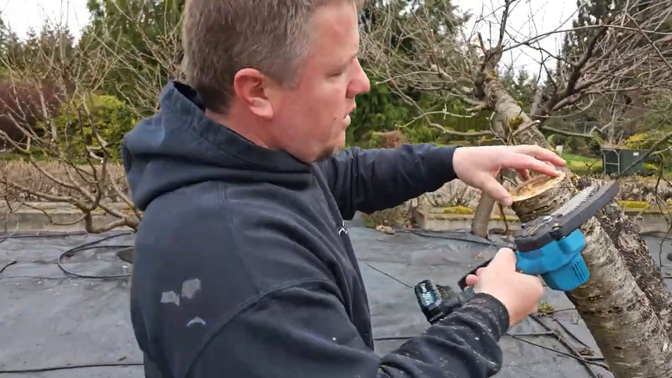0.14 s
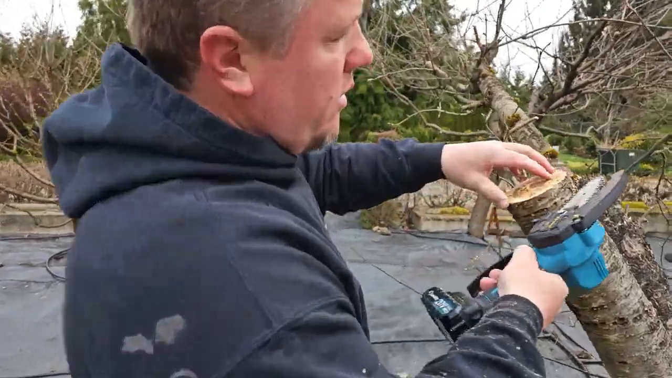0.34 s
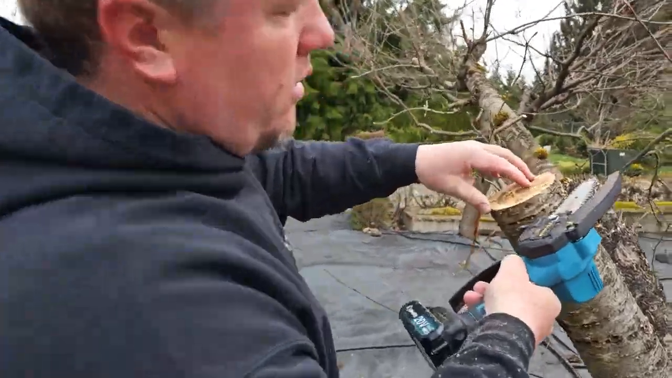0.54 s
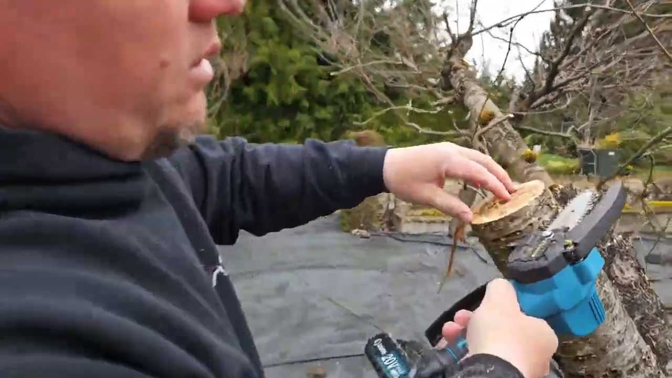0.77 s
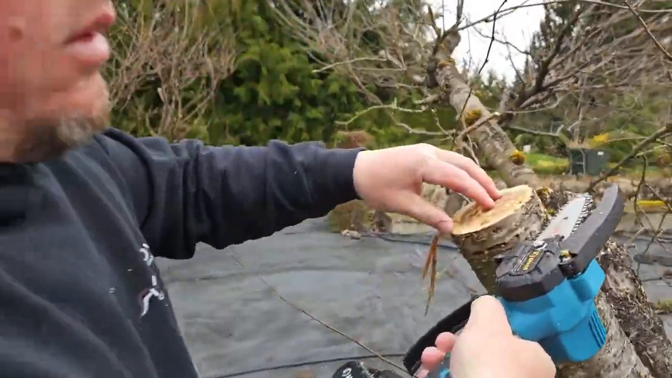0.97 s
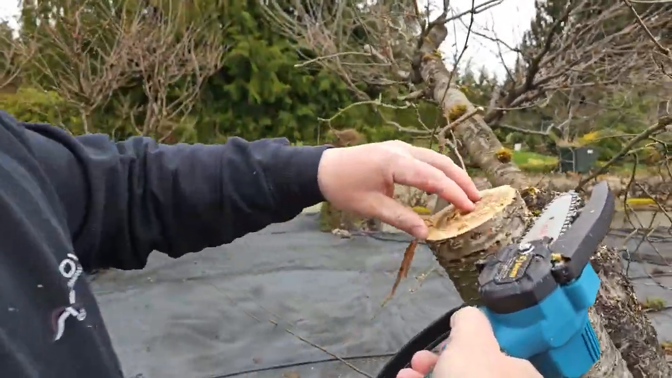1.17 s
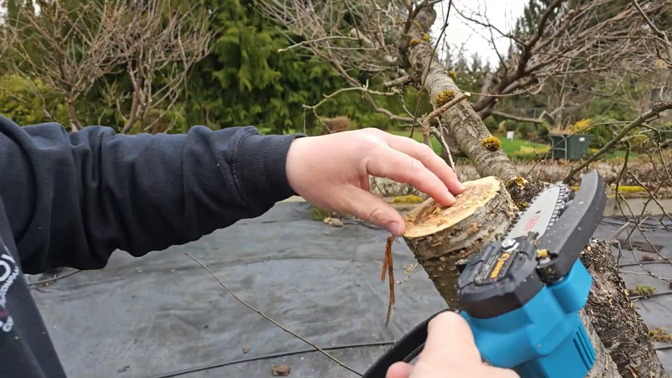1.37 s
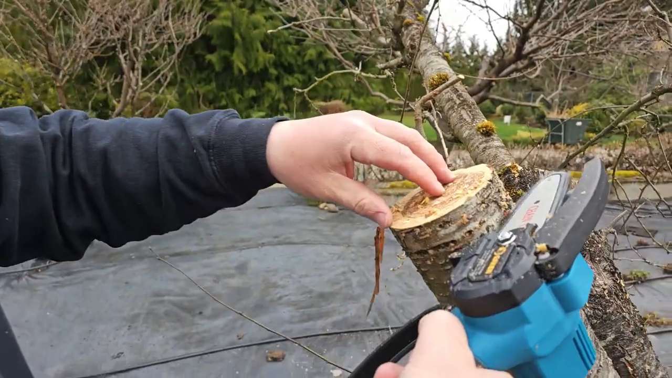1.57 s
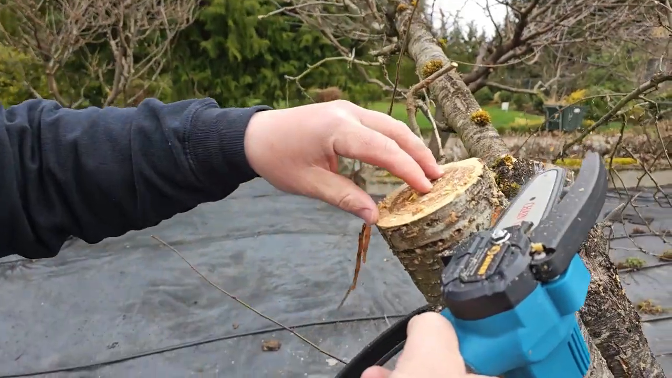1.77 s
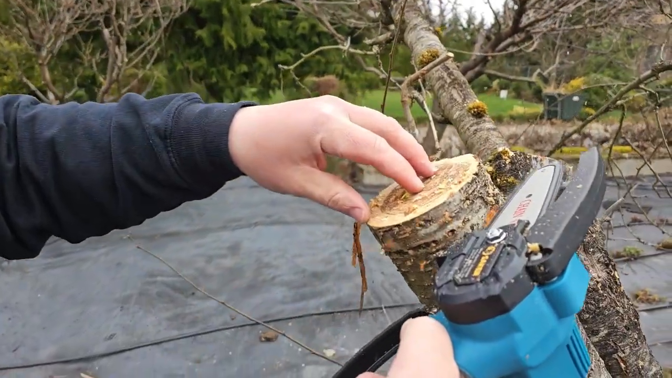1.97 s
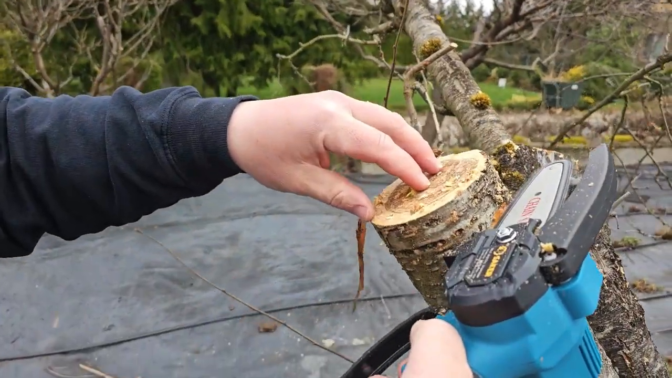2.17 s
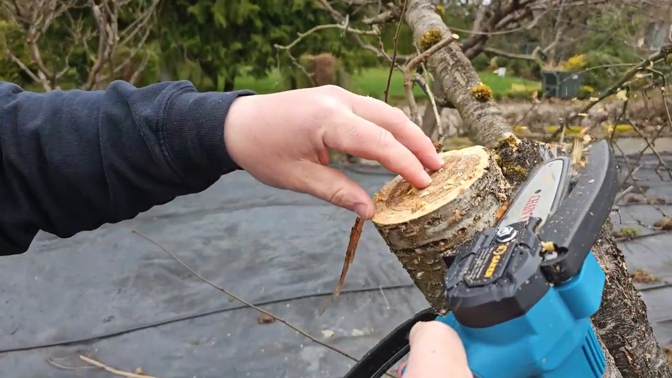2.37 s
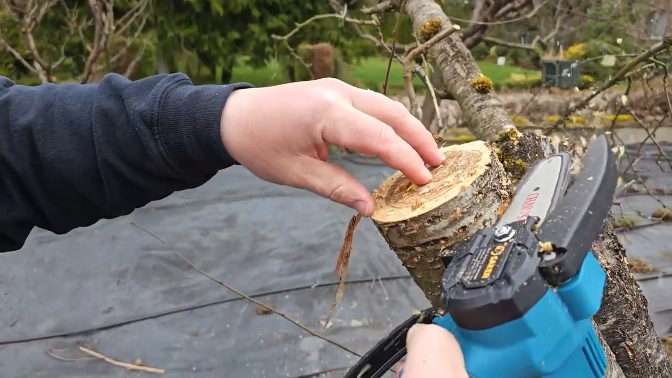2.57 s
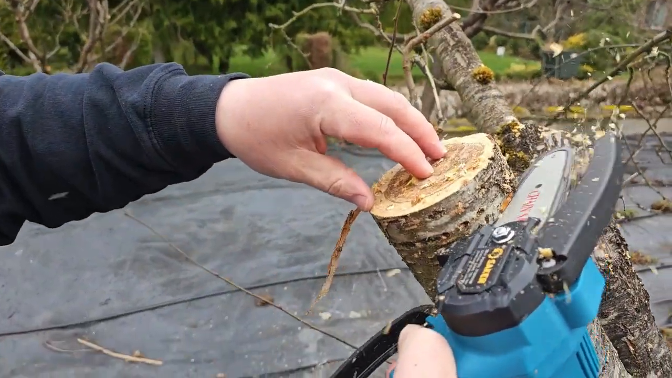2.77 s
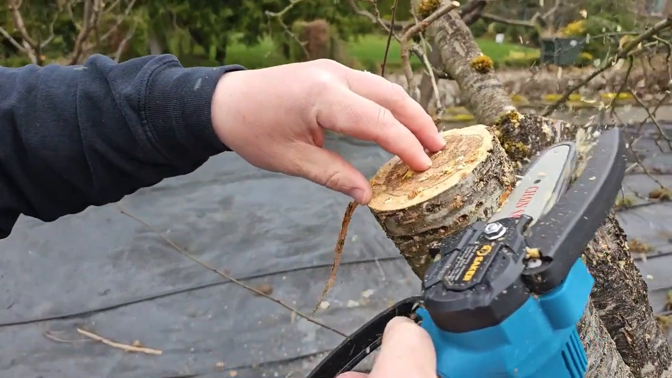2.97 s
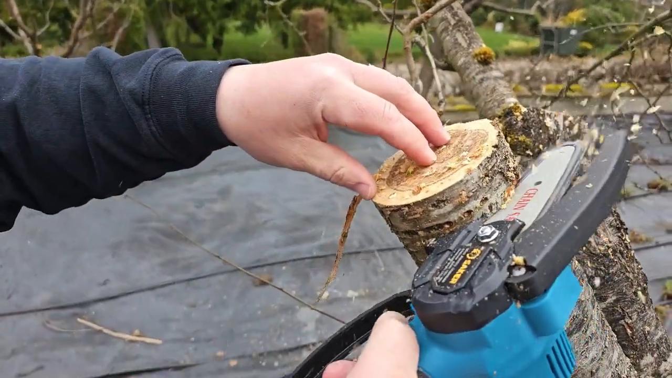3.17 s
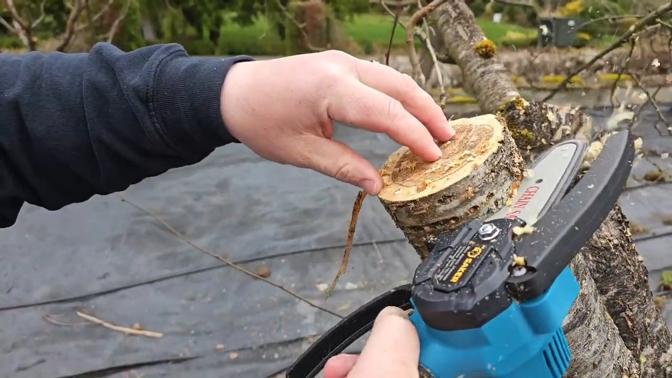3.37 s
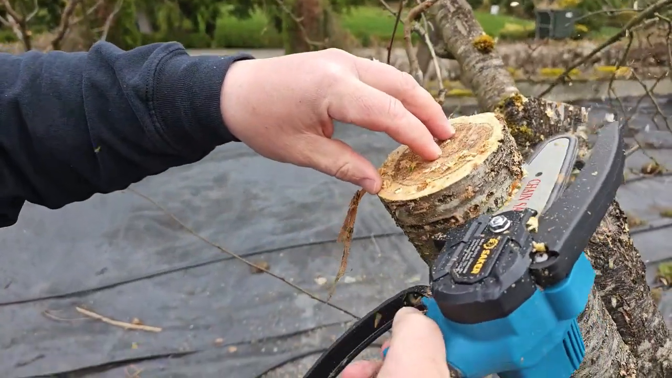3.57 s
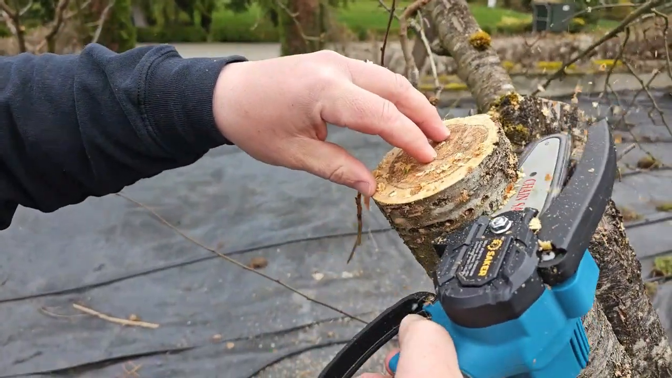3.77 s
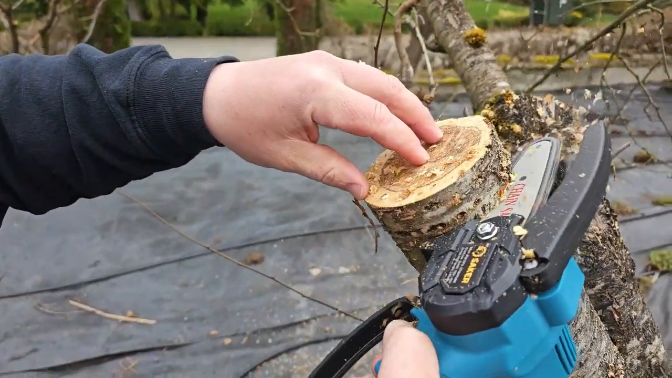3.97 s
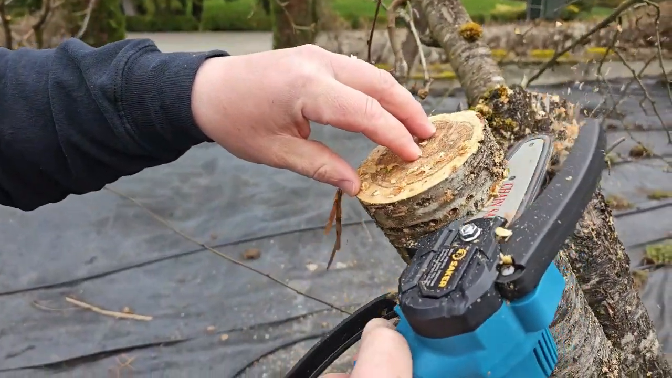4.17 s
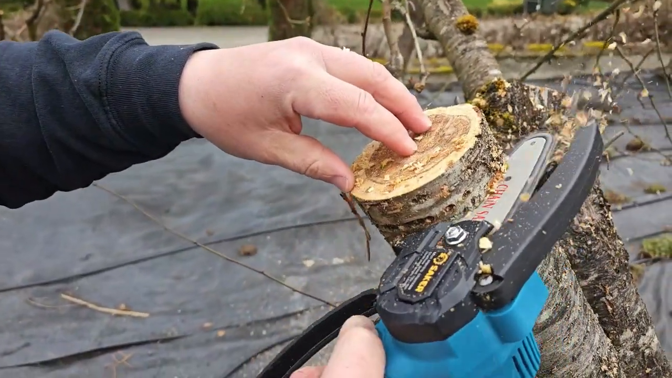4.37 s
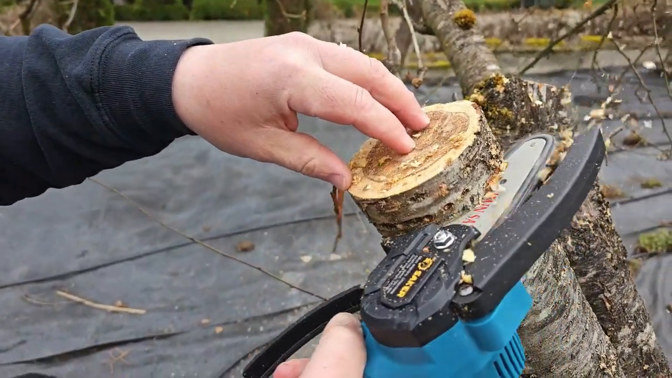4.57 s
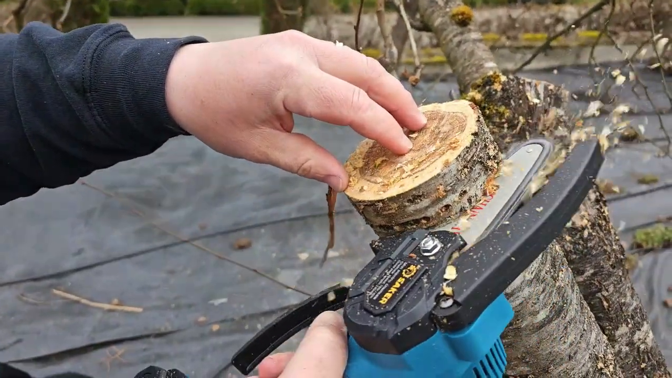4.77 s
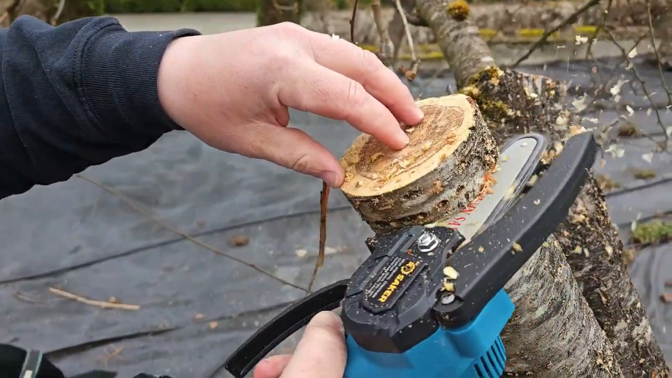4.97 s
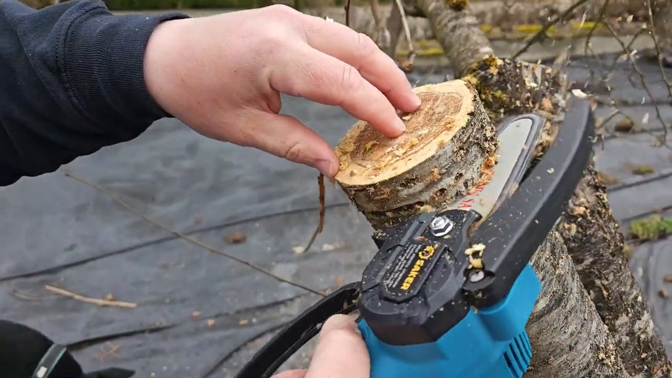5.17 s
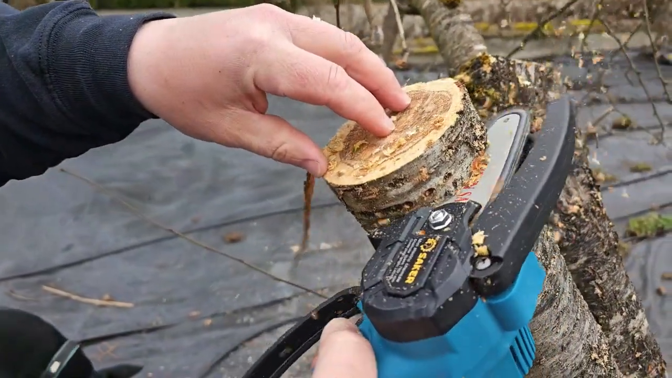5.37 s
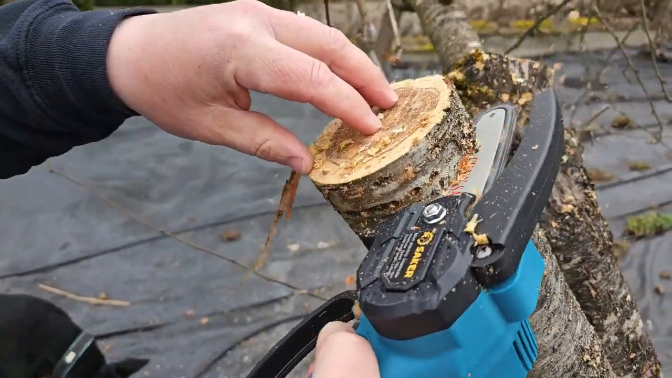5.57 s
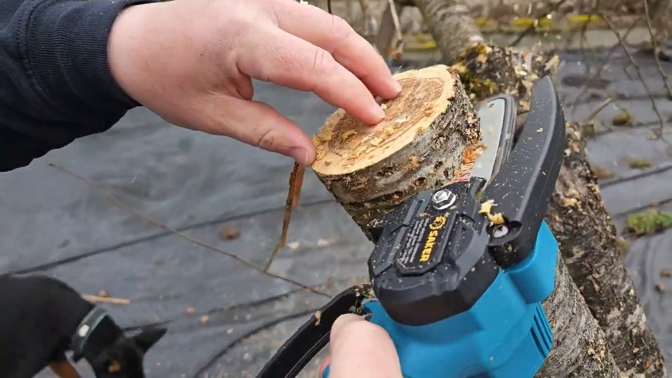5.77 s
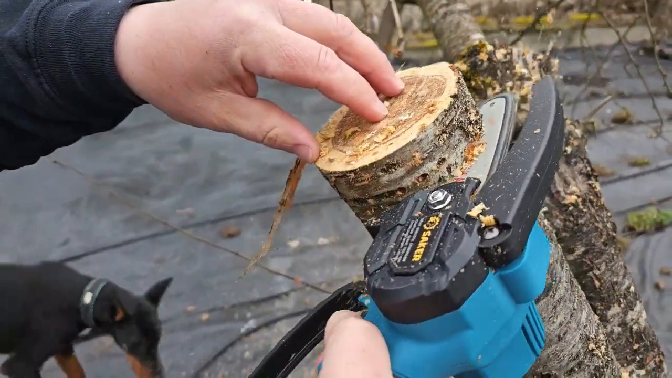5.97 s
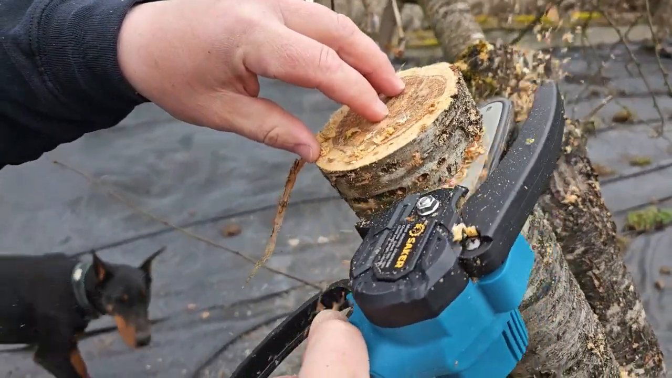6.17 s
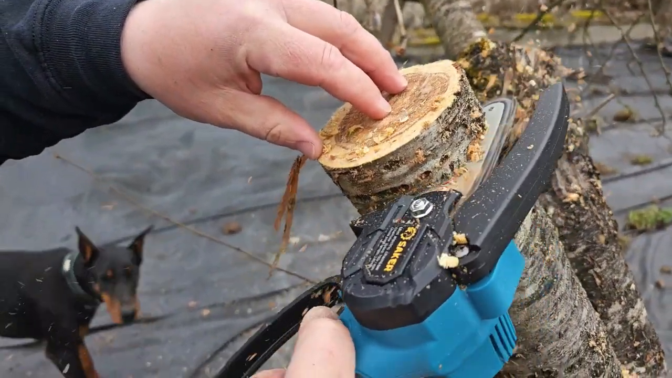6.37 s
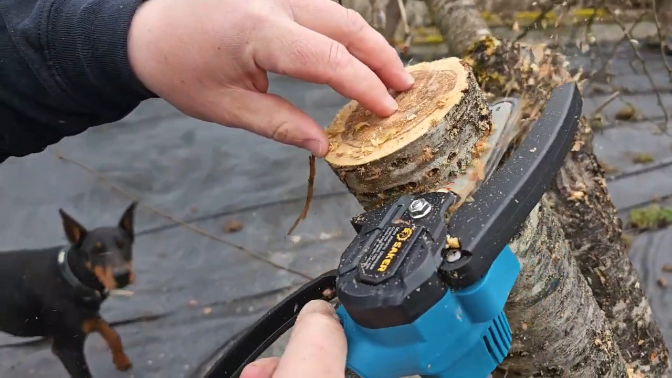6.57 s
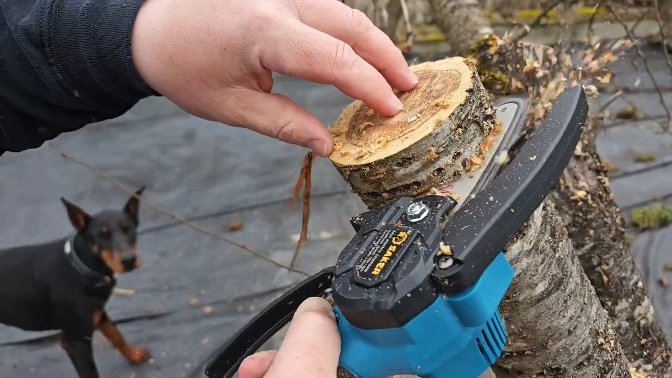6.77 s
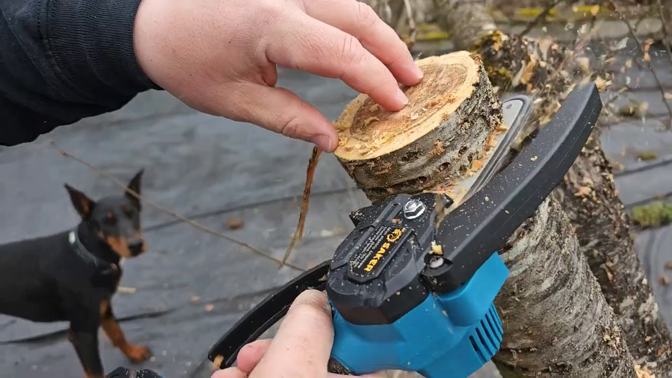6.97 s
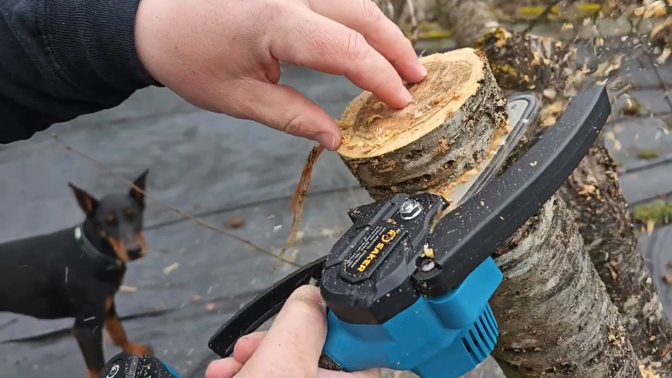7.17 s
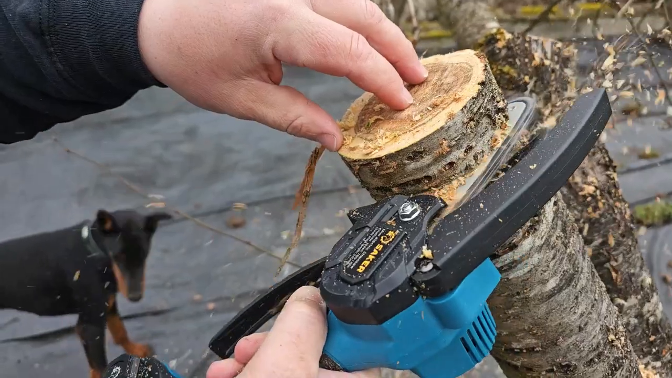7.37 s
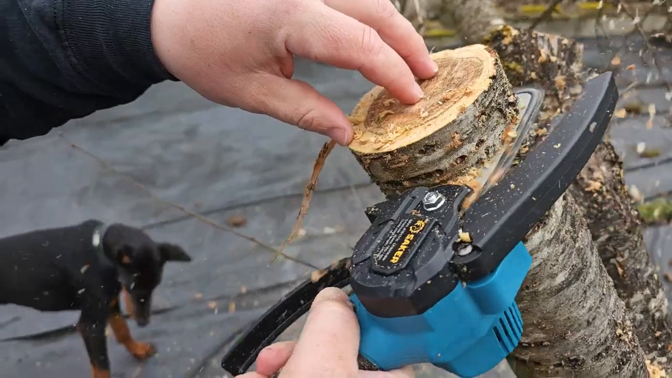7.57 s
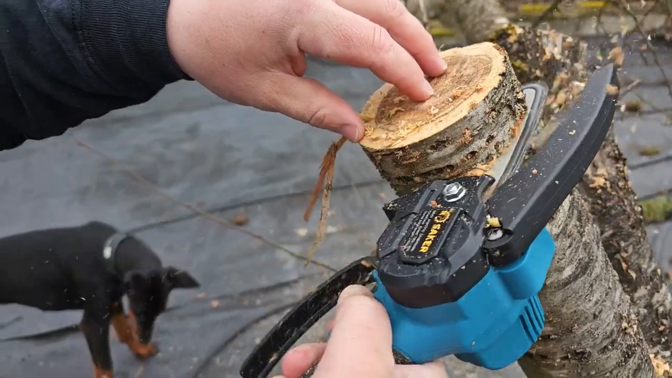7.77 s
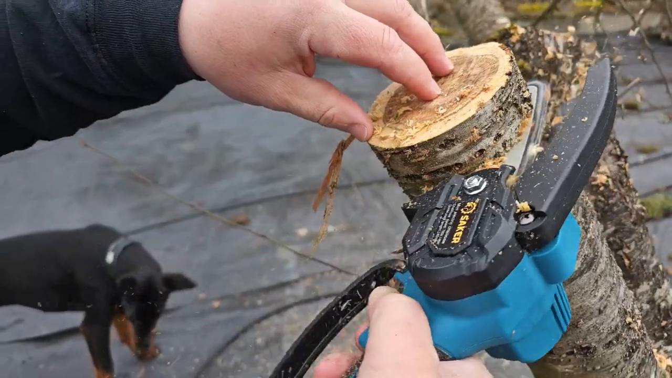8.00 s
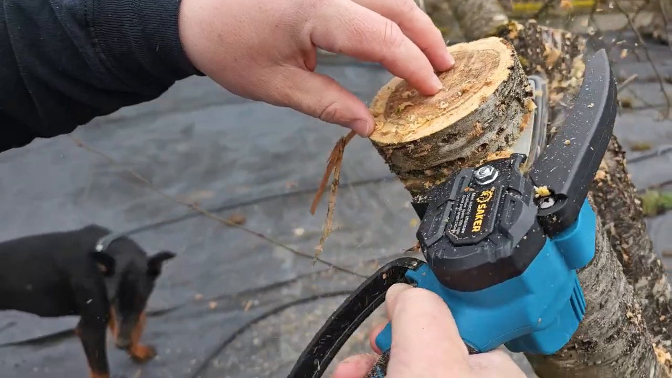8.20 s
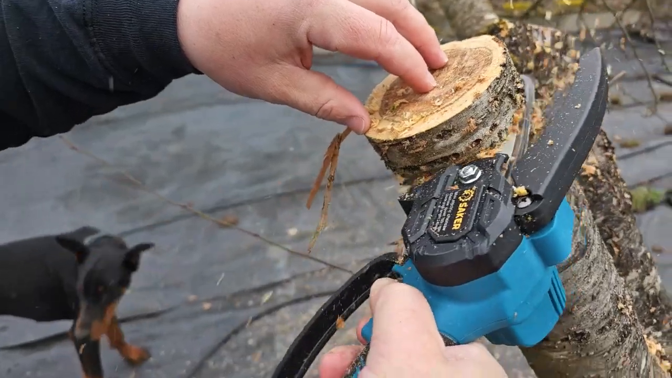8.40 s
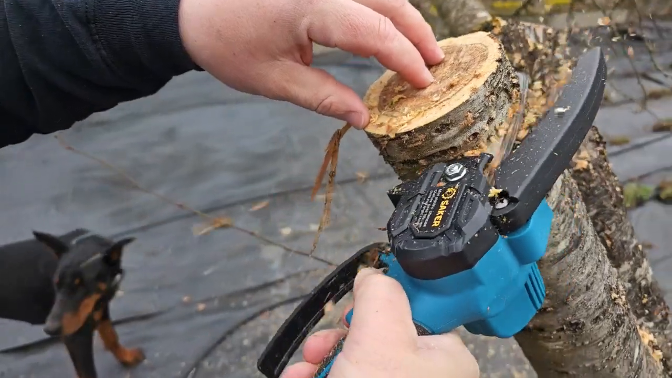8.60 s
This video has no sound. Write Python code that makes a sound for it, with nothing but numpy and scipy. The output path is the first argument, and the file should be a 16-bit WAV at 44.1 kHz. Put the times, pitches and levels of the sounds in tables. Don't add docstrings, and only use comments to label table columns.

```python
import sys
import numpy as np
from scipy import signal
from scipy.fft import rfft, irfft
from scipy.io import wavfile
from scipy.ndimage import map_coordinates

SR = 44100
rng = np.random.default_rng(int(sys.argv[2]) if len(sys.argv) > 2 else 0)


def store_wav(level_fs):
    pcm = np.round(np.clip(np.atleast_2d(level_fs), -1, 1) * 32767)
    wavfile.write(sys.argv[1], SR, pcm.T.astype(np.int16))


def how_loud(loudness_db):
    steps = np.asarray(loudness_db, float) / 20
    return 10 ** steps


N = 381024
T = np.arange(N) / SR
HZ = np.fft.rfftfreq(N, 1 / SR) + 1e-3

FREE_TURNS_PER_S = 413
START_S = 1.636
TEETH_ATTACK_S, CHAIN_ATTACK_S = .003, .016

# start_s, turns_per_s
MOTOR_SPEED = [(2.1, 413), (2.66, 345), (2.95, 359), (3.36, 320), (3.96, 322), (4.24, 292), (4.42, 318),
               (5.0, 287), (5.15, 268), (5.42, 326), (5.8, 294), (6.62, 275), (6.81, 291), (7.04, 282),
               (7.16, 302), (7.62, 294), (8.12, 313), (8.64, 250)]
# start_s, bite_db (teeth in the wood), open_db (chain open to the microphone),
# bar_turn_db (bar turned towards the microphone)
SAW_HANDLING = [(1.7, -21.5, -18, 0.5), (1.85, -21.5, -16.5, -0.2), (2.2, -23.5, -22, -0.5),
                (2.7, -24.5, -22.5, -1.2), (3.1, -24.5, -22.5, -1.2), (3.5, -24, -23, 0.7),
                (4.1, -24.5, -23, -2), (4.5, -24, -25, 0.5), (4.9, -24.5, -25, 2.1), (5.2, -23.5, -24, 2),
                (5.55, -23.5, -22.5, 1.1), (5.9, -23, -23, 0.5), (6.6, -25, -23, 0.9),
                (7.3, -23.5, -22.5, 3.5), (7.8, -23, -23, 0.5), (8.08, -22.5, -22.5, 0.8),
                (8.3, -24, -24.5, -0.2), (8.64, -24.5, -25.5, 0.7)]
# start_s, peak_db, ring_hz
CAUGHT_TEETH = [(1.637, -22, 1400), (1.646, -7, 1390), (1.724, -7, 1750), (1.797, -4.5, 1530),
                (2.561, -6.5, 1710), (2.879, -18, 2060), (3.333, -9, 1660), (4.087, -2, 1870),
                (5.06, -17, 2160), (5.331, -8, 2160), (5.531, -6, 2090), (5.977, -5.5, 1660),
                (6.094, -0.5, 2150), (6.421, -1, 2100), (6.514, -1.5, 1920), (6.581, -0.5, 2020),
                (6.652, -3.5, 2140), (6.725, -5.5, 2150), (6.952, -9, 1760), (7.016, -3.5, 2030),
                (7.355, -5, 1650), (7.611, -5.5, 1750), (7.778, 0, 1790), (7.926, -6, 2050),
                (8.06, -2, 2150), (8.273, -3, 2120), (8.54, 0.5, 1720), (8.602, -2.5, 1780)]


def rms_one(x):
    return x / np.sqrt(np.mean(x ** 2) + 1e-20)


def in_time(rows):
    s, *columns = np.transpose(rows)
    return [np.interp(T, s, c) for c in columns]


def at_hz(points):
    hz, value = np.transpose(points)
    return np.interp(np.log(HZ), np.log(hz + 1), value)


def drift(rate):
    r = np.exp(-32 * np.pi * rate / SR)
    noise = rng.standard_normal(N // 16 + 4002)
    slow = signal.lfilter([1], [1, -2 * r, r * r], noise)[4000:]
    return np.interp(np.arange(N) / 16, np.arange(len(slow)), rms_one(slow))


def bell(s, length):
    return np.exp(-((T - s) / length) ** 2)


def started(attack_s):
    return 1 - np.exp(-(np.maximum(T - START_S, 0) / attack_s) ** 2)


def pan(x, db):
    return x * how_loud(np.array([db / 2, -db / 2]).reshape(2, -1))


def ring(hz, t60):
    t = np.arange(SR // 25) / SR
    return np.sin(2 * np.pi * hz * t) * how_loud(-60 * t / t60) * (1 - np.exp(-t / 0.00019))


def add(out, s, sound):
    i = round(s * SR)
    out[..., i:i + sound.shape[-1]] += sound[..., :N - i]


def ports(near, scattered):
    # pitch_hz, likeness (0 to 1)
    likeness = [(300, .78), (700, .66), (1300, .72), (2000, .58), (3500, .6), (6000, .38), (7800, .36),
                (15000, .25)]
    # pitch_hz, lead_radians
    phase_lead = [(300, 0), (900, .6), (1270, 3.1), (1600, 5.9), (2500, 2 * np.pi)]
    alike = np.clip(at_hz(likeness), 0, 1)
    ahead = np.exp(.5j * at_hz(phase_lead))
    shared = np.sqrt(alike) * rfft(near)
    own = np.sqrt(1 - alike) * rfft(scattered)
    return own + shared * [ahead, 1 / ahead]


def bands(spectra, low_hz, high_hz, patchy_db, count):
    borders_hz = np.geomspace(low_hz, high_hz, count + 1)
    above = [.5 + .5 * np.tanh(30 * np.log(HZ / hz)) for hz in borders_hz]
    total = 0
    for lower, upper in zip(above, above[1:]):
        total = total + how_loud(patchy_db * drift(14.8)) * irfft(spectra * (lower - upper), N)
    return rms_one(total)


def contacts(gate, per_s, spread_db, smooth):
    sizes = how_loud(spread_db * np.minimum(rng.exponential(1, (3, N)), 5))
    clicks = sizes * rng.standard_normal((3, N)) * (rng.random((3, N)) < per_s / SR)
    return gate * (rms_one(clicks) + smooth * rng.standard_normal((3, N)))


def speed():
    loaded = in_time(MOTOR_SPEED)[0]
    waver = 1 + .02 * motor_load() * drift(5)
    spin_up = 1 - .4 * np.exp(-np.maximum(T - START_S, 0) / .05)
    return loaded * waver * spin_up


def motor_load():
    return 1 - in_time(MOTOR_SPEED)[0] / FREE_TURNS_PER_S


def motor(turns):
    # multiple (of the turn rate), level_db
    overtone_levels = [(2, -1), (3, -1), (4, -10)]
    # start_s, length_s, hum_db, overtones_db, whistle_db
    hand_eases = [
        (2.3, 0.22, 1.5, -1, -13),
        (2.95, .3, 1.5, 1.5, -6),
        (3.65, .5, 1, 8, -5),
        (4.245, 0.1, 7, -2, -21),
        (4.504, 0.32, -13, 13.5, -2),
        (5.395, 0.4, 7, 13, -8),
        (5.998, 0.16, 8, -9, -6),
        (7.35, 0.4, 0, 13.5, 1),
        (7.92, .13, 14.5, 7, -3),
        (8.5, 0.28, 10.5, 12.5, -9.5),
    ]
    load = motor_load()
    eased_db = sum(np.outer(db, bell(s, length)) for s, length, *db in hand_eases)
    hum_db = -41 - 60 * load + eased_db[0]
    overtones_db = -38.5 - 80 * load + eased_db[1]
    whistle_db = -40 + 32.5 * load + eased_db[2]

    shaken = 2 * np.pi * turns + 3.0 * load * drift(14)
    hum = how_loud(hum_db + 1.7 * drift(10.4)) * np.sin(shaken)
    overtones = sum(how_loud(db + 2.17 * drift(7.7)) * np.sin(k * shaken) for k, db in overtone_levels)
    hum += how_loud(overtones_db) * overtones
    segments = 2 * np.pi * 12 * turns
    whistle = drift(85) * np.sin(segments) + drift(85) * np.cos(segments)
    whistle *= how_loud(whistle_db + 1.75 * drift(16))
    return started(.04) * (np.sqrt(2) * hum + whistle)


def saw_colour():
    # pitch_hz, level_db (per Hz)
    broad = [(140, -49), (230, -23.5), (358, -8.5), (539, -14.5), (704, -9.5), (1410, -0.5), (2080, -6),
             (2530, -6.5), (3540, -2.5), (4460, -4), (6470, -3.5), (7870, -5.5), (11400, -1.5), (15200, -5),
             (16000, -30)]
    # pitch_hz, width_hz, level_db
    resonances = [(355.7, 17, 9), (718, 200, 6), (1710, 120, 5.5), (1897, 140, -4.5), (2090, 670, 13),
                  (2700, 300, 2.5), (3750, 310, 2), (4800, 350, -1.5), (5420, 1200, 4.5), (6040, 380, -1),
                  (7720, 260, 6.5), (8200, 300, 5), (9460, 1100, 4), (11300, 890, -3), (15100, 1700, 9)]
    bumps_db = sum(db / (1 + ((HZ - hz) / (wide / 2)) ** 2) for hz, wide, db in resonances)
    return how_loud(at_hz(broad[:-1]) + bumps_db)


def layer_gain(control_db, offset_db, share, load_db, turn_share):
    mean_db = control_db.mean()
    handled_db = mean_db + offset_db + share * (control_db - mean_db)
    return how_loud(handled_db + load_db * (motor_load() - 0.1863) + turn_share * in_time(SAW_HANDLING)[2])


def cutters(turns, colour):
    bite_db = in_time(SAW_HANDLING)[0]
    sprocket_db = 1.65 * np.cos(2 * np.pi * turns / 7 + 1.53 * drift(6.1))
    gate = how_loud(sprocket_db + 0.78 * drift(42) + 0.52 * np.cos(2 * np.pi * turns))
    grains = contacts(gate * catches(), per_s=2500, spread_db=1.95, smooth=1.0)
    spectra = colour * ports(grains[0], grains[1:])

    branch = layer_gain(bite_db, -22.5, 0.1, 11, 0.1) * bands(spectra, 147, 483, 2.3, count=1)
    wood = layer_gain(bite_db, -10.5, 1.77, 14, 0.1) * bands(spectra, 470, 1315, 1.44, count=2)
    bar = layer_gain(bite_db, -3.5, 1.4, 1, -.4) * bands(spectra, 1178, 2934, 1.35, count=3)
    edge = layer_gain(bite_db, -2.5, 1.07, -7, .4) * bands(spectra, 2900, 7300, 1.37, count=4)
    edge *= 0.38 + .6 * started(CHAIN_ATTACK_S)
    jolt = how_loud(5 * bell(START_S, 0.044))
    return started(TEETH_ATTACK_S) * (jolt * (branch + wood) + bar + edge)


def catches():
    out = np.ones(N)
    for s, db, _ in CAUGHT_TEETH:
        add(out, s, 1.1 * how_loud(db) * np.exp(-T[:2000] / 0.0039))
    return out


def knocks():
    out = np.zeros(N)
    for s, db, hz in CAUGHT_TEETH:
        knock = ring(hz, 0.015) + 0.28 * ring(0.51 * hz, 0.008) + 0.14 * ring(1.54 * hz, 0.0036)
        add(out, s, how_loud(db - 7.5) * knock)
    return out


def rattle(turns, colour):
    open_db = in_time(SAW_HANDLING)[1]
    turn_db = 2.8 * np.cos(2 * np.pi * turns) + 0.81 * np.cos(np.pi * turns)
    gate = how_loud(turn_db + 1.46 * drift(81) + 0.29 * drift(8.9))
    grains = contacts(gate, per_s=6000, spread_db=2.1, smooth=1.0)
    spectra = colour * ports(grains[0], grains[1:])

    lower = layer_gain(open_db, -2, 1, 2, -.4) * bands(spectra, 6970, 8700, 0.96, count=2)
    upper = layer_gain(open_db, -3.5, 1.27, 3.5, .9) * bands(spectra, 8720, 10440, 0.68, count=2)
    hiss = layer_gain(open_db, -1, 0.95, 2, -.4) * bands(spectra, 10520, 15750, 0.89, count=3)
    at_once = .2
    rise = at_once * started(TEETH_ATTACK_S) + (1 - at_once) * started(CHAIN_ATTACK_S) ** 2
    return rise * (lower + upper + hiss)


def bearing(x):
    # start_s, lag_samples (left behind right)
    port_lag = [(1.6, 2.2), (3.2, 1.9), (3.9, .8), (4.6, -.4), (5.4, -1), (6.2, -2.2), (7.2, -1.6),
                (8.64, -.6)]
    lag = in_time(port_lag)[0]
    left = map_coordinates(x[0], [np.arange(N) - lag / 2], order=3)
    right = map_coordinates(x[1], [np.arange(N) + lag / 2], order=3)
    return np.array([left, right])


def rustle():
    # pitch_hz, level_db (per Hz)
    rub_colour = [(350, -34), (600, -4), (834, -8), (1100, -1.5), (1640, -8.5), (2150, -9.5), (7830, -15.5),
                  (9760, -15), (16000, -19)]
    # start_s, length_s, dull_db, bright_db
    rub_times = [
        (0.029, 0.053, -58.5, -54),
        (0.325, 0.021, -60.5, -66),
        (0.373, .1, -64, -57),
        (.49, 0.069, -59.5, -56),
        (0.962, 0.059, -68, -71),
        (1.3, 0.011, -59, -82),
        (1.455, 0.064, -53.5, -58.5),
        (1.536, .1, -56, -59.5),
    ]
    dull, bright = 0, 0
    for s, length, dull_db, bright_db in rub_times:
        rise = np.clip((T - s) / .018 + 1, 0, 1) ** 2
        stroke = rise * np.exp(-np.maximum(T - s - length, 0) / .024)
        dull = dull + how_loud(dull_db) * stroke
        bright = bright + how_loud(bright_db) * stroke
    grains = contacts(how_loud(2.5 * drift(60)), per_s=3000, spread_db=3.9, smooth=1.6)
    spectra = rfft(grains[1:] + 0.29 * grains[0]) * how_loud(at_hz(rub_colour))
    rub = dull * bands(spectra, 550, 2860, 0.57, count=2)
    rub = rub + bright * bands(spectra, 2880, 17000, 1.2, count=2)
    return pan(rub, -1.5)


def ticks():
    # start_s, peak_db, ring_hz, left_right_db
    taps = [(.02, -39, 281, -1.0), (.0204, -49, 4360, -1.0), (.1444, -56, 2210, 0.1),
            (.159, -53, 320, -1.0), (.2094, -57, 3847, -.6), (.2892, -56, 10000, -1.0),
            (.326, -50, 1390, -1.0), (.4668, -50, 5060, -1.5), (.6105, -52, 4160, -2.0),
            (.6619, -59, 2200, -2.5), (.841, -51, 9900, -2.0), (.9857, -52, 2210, 0.1),
            (1.0794, -56, 2240, 0.1), (1.1194, -56, 2380, 2.5), (1.2052, -55, 7410, 1.0),
            (1.255, -59, 10200, 3.0), (1.301, -36, 647, -3), (1.3234, -52, 2230, 0.1),
            (1.3394, -56, 2200, .6)]
    out = np.zeros((2, N))
    for s, db, hz, pan_db in taps:
        t60 = .007 + 6.5 / hz
        tone = ring(hz, t60)
        grit = signal.lfilter([.3], [1, -.7], rng.standard_normal(len(tone)))
        rough = 1 + min(hz / 3000, 1.5) * grit
        tap = tone * rough + .5 * ring(min(2.36 * hz, 15000), .5 * t60)
        add(out, s, pan(how_loud(db) * tap, np.array(pan_db)))
    return out


def wind():
    # pitch_hz, level_db (per Hz)
    wind_colour = [(12, -37), (20, -12.5), (54, 1.5), (92, -5.5), (124, -4), (173, -5.5), (260, -5.5),
                   (340, -29), (570, -120)]
    # start_s, level_db
    steady_air = [(0, -71), (1.3, -60.5), (2.3, -64), (3.6, -53), (6.3, -49), (8.64, -48)]
    # start_s (of the peak), peak_db, length_s
    gust_times = [(.07, -45, 0.066), (.365, -53, .02), (0.54, -46, 0.026), (.62, -49, .03), (.7, -53, .02),
                  (0.893, -48, 0.023), (1.0, -57, .02), (1.303, -67, 0.053), (1.456, -52, 0.022),
                  (2.76, -55, .1), (3.674, -47, 0.034), (4.147, -52, 0.082), (4.31, -33, 0.018),
                  (4.476, -51, .05), (4.695, -50, 0.037), (5.68, -48.5, 0.017), (5.803, -35, 0.056),
                  (6.11, -40, .04), (6.466, -50, 0.059), (6.74, -46, 0.039), (6.952, -45, .03),
                  (7.13, -43, 0.056), (8.38, -57.5, .06), (8.63, -47, 0.036)]
    white = rng.standard_normal((3, N))
    low = rfft(white[1:] + .85 * white[0]) * how_loud(at_hz(wind_colour))
    lumps_db = 2.0 * drift(9) + 1.5 * np.array([drift(4.0), drift(4.0)])
    air = rms_one(irfft(low, N))
    thump = rms_one(irfft(low / (1 + (HZ / 110) ** 6), N))
    gusts = sum(how_loud(db) * bell(s, length) for s, db, length in gust_times)
    steady = how_loud(in_time(steady_air)[0])
    return how_loud(lumps_db) * ((steady + 0.34 * gusts) * air + 0.6 * gusts * thump)


def bird():
    # start_s, pitch_hz, level_db
    chirp = [
        (.018, 4160, -88),
        (.026, 4500, -51),
        (.04, 4320, -60),
        (.05, 3620, -54),
        (.065, 2700, -75),
    ]
    hz, db = in_time(chirp)
    return how_loud(db + 6.4 * drift(300)) * (db > -75) * np.sin(2 * np.pi * np.cumsum(hz) / SR)


def garden():
    # pitch_hz, level_db (per Hz)
    murmur_colour = [(88, -31), (150, -1), (457, 1.5), (589, -6.5), (774, -8), (923, -12), (2140, -20),
                     (4240, -27), (5790, -29), (6510, -35), (10200, -20), (11500, -41.5), (16000, -38)]
    white = rng.standard_normal((3, N))
    murmur = irfft(rfft(white[1:] + 0.71 * white[0]) * how_loud(at_hz(murmur_colour)), N)
    return how_loud(-60 + 1.2 * drift(4)) * rms_one(murmur)


def scene():
    turns = np.cumsum(speed()) / SR
    colour = saw_colour()
    tones = motor(turns) + knocks()
    echo = how_loud(-9.5) * np.array([np.roll(tones, 190), np.roll(tones, 243)])
    saw = tones + echo + cutters(turns, colour) + rattle(turns, colour)
    return bearing(saw) + rustle() + ticks() + wind() + bird() + garden()


def low_pass(x):
    return signal.sosfilt(signal.butter(12, 17080, fs=SR, output="sos"), x)


def record(dry):
    below = .5 - .5 * np.tanh((HZ - 15800) / 25)
    rounded = 0.93 * np.tanh(dry / 0.78)
    mix = irfft(rfft(rounded) * below, N)
    return low_pass(mix)


dry = scene()
out = record(dry)
store_wav(out)
```